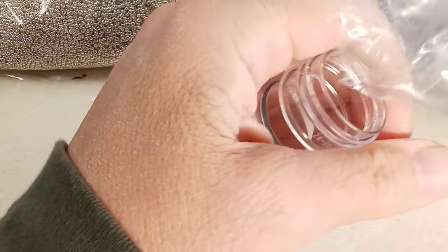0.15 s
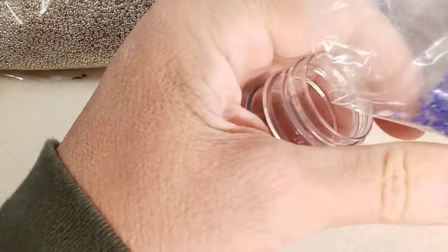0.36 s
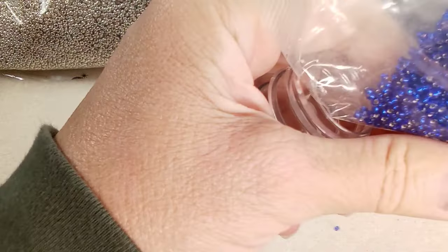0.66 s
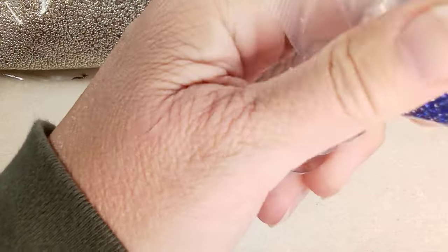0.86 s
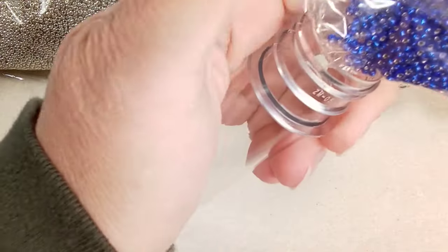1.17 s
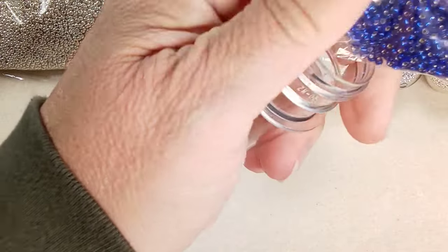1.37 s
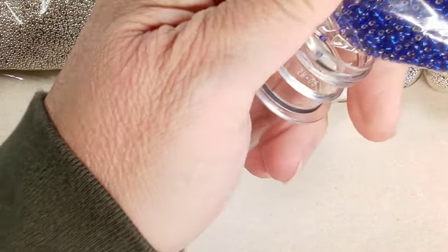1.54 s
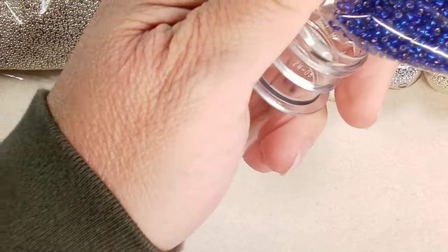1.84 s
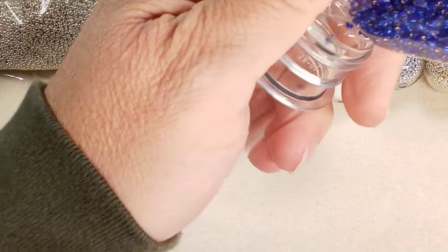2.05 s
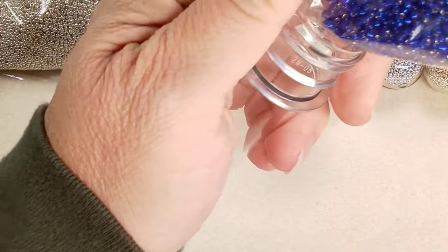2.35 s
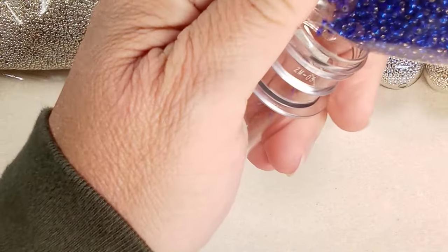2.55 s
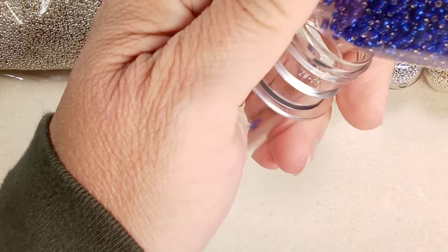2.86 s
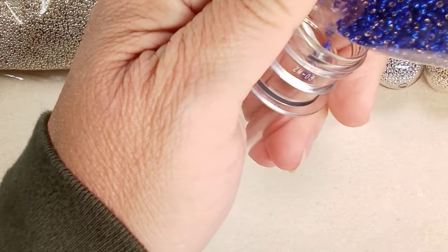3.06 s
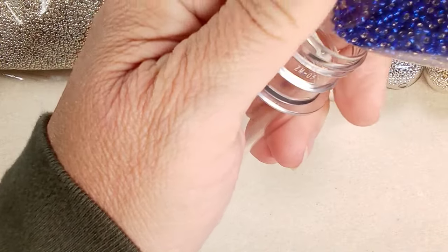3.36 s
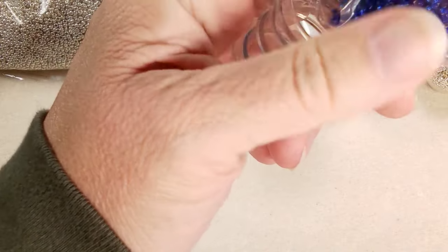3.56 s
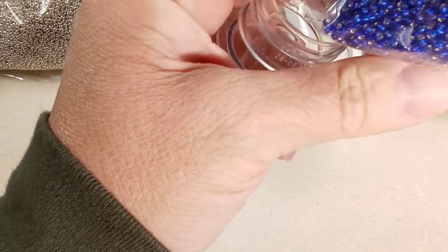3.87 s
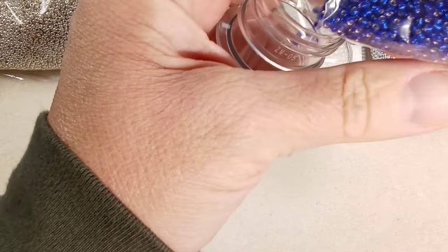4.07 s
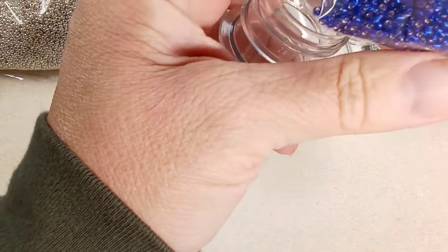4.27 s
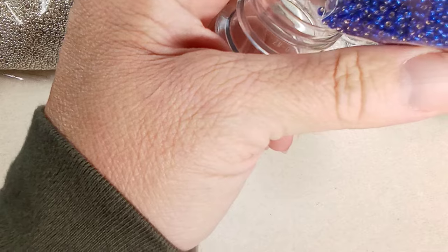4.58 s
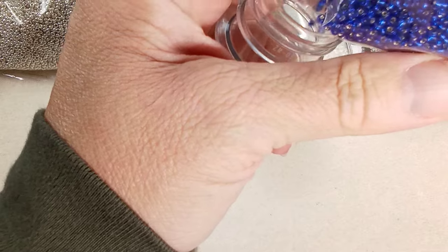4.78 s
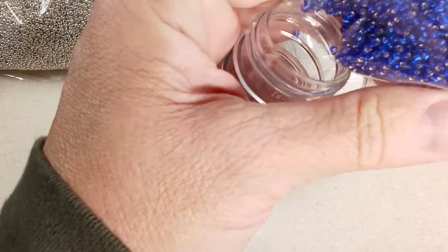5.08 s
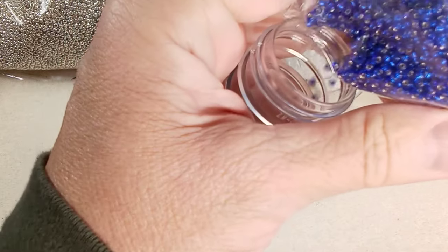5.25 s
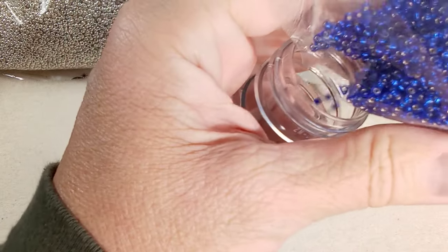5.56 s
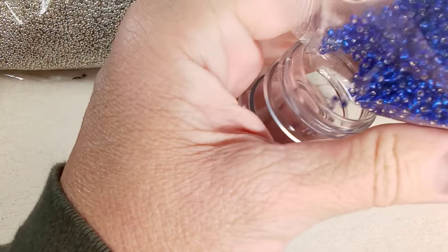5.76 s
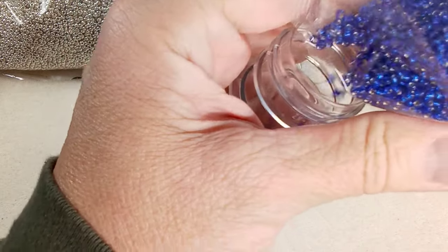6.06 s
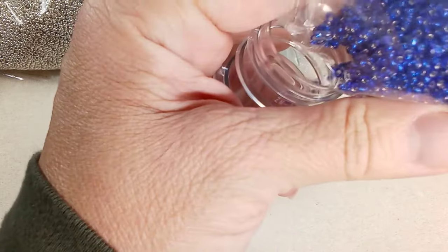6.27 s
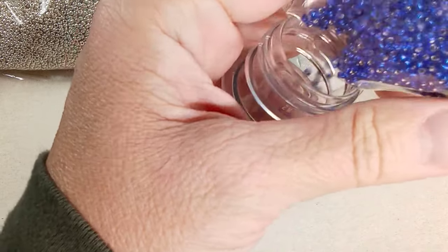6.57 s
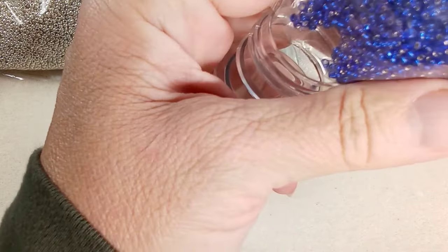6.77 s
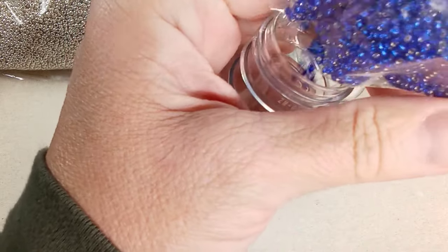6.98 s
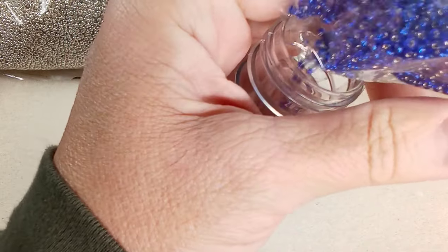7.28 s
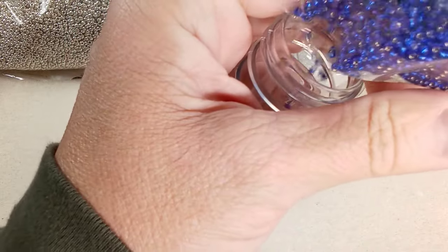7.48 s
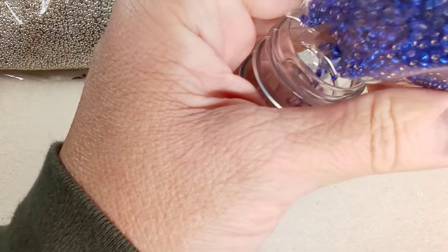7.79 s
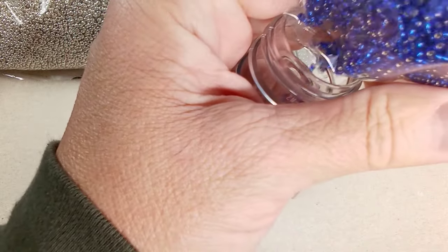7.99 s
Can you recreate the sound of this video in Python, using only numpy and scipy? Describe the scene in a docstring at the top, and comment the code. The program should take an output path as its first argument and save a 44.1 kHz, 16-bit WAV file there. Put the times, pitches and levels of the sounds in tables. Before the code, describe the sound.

A thin plastic bag of tiny glass beads crinkles and snaps sharply over a small jar, then quiets to sparse ticks before rustling again.

```python
"""In a quiet room, a thin plastic bag of tiny glass beads is tipped and squeezed over a small jar in the hand.
Clumped random clicks ring short resonances: the film crinkles, beads tick on each other and the jar.
Single snaps are cracks with a decaying sine; creases and pushes boom faintly in the hollow of jar and hand.
Below lie filtered-noise hiss, rumble and thuds and a wavering sine hum; a small microphone hears little
above 4 kHz."""
import sys
import numpy as np
from scipy import signal
from scipy.fft import rfft, irfft
from scipy.io import wavfile
from scipy.ndimage import uniform_filter1d

SR = 44100
rng = np.random.default_rng(int(sys.argv[2]) if len(sys.argv) > 2 else 0)


def to_wav(s):
    """Save 16-bit WAV."""
    ch = np.atleast_2d(s).T  # columns
    pcm = np.round(np.clip(ch, -1, 1) * 32767)  # PCM
    wavfile.write(sys.argv[1], SR, pcm.astype(np.int16))


N = 358533

# Snaps of the film and lone bead hits, before filters and microphone.
# Each row: start in seconds, ring level in dB, ring pitch in Hz, push into the hollow in dB.
SNAPS = [(0.026, -53, 851, -56), (0.101, -51, 1640, -81), (0.219, -49, 1630, -76), (0.239, -39, 2520, -70),
         (0.2473, -37, 1710, -75), (0.2723, -40, 2740, -47), (0.3446, -35, 1590, -47.5),
         (0.3953, -22, 1520, -42), (0.6045, -27, 1650, -36.5), (0.6464, -41, 1730, -43.5),
         (0.712, -43, 1780, -42.5), (0.7321, -23.5, 1560, -39.5), (0.7866, -20.5, 1620, -29.5),
         (0.8268, -25, 3320, -27.5), (0.848, -27, 2650, -45), (0.8699, -26.5, 1460, -41),
         (0.9097, -18.5, 1500, -38), (0.9382, -19, 1520, -31.5), (0.9687, -42, 1560, -48),
         (0.9811, -26, 1600, -34), (1.0155, -17.5, 1580, -43), (1.058, -32, 1850, -65),
         (1.1042, -33, 1800, -61), (1.2119, -39, 1620, -70), (1.4112, -32.5, 2560, -53.5),
         (1.438, -32, 1830, -60.5), (1.4657, -20.5, 1590, -30), (1.479, -16, 1540, -29.5),
         (1.4986, -20, 1490, -28), (1.5307, -20, 3250, -31.5), (1.5725, -13, 1500, -32.5),
         (1.6099, -27.5, 1920, -37.5), (1.636, -35.5, 3150, -47), (1.6596, -25.5, 2350, -42.5),
         (1.733, -30.5, 3220, -37), (1.7749, -31, 1740, -41), (1.8447, -39.5, 1800, -62),
         (1.8663, -32.5, 1700, -52), (1.8873, -34.5, 1700, -48), (1.933, -36, 1540, -47.5),
         (1.9784, -48, 1800, -39.5), (1.9957, -20.5, 1600, -37.5), (2.035, -42, 1580, -36.5),
         (2.0446, -29, 1600, -39), (2.05, -31, 1440, -44), (2.0697, -33.5, 2680, -54),
         (2.095, -17.5, 1870, -37.5), (2.1, -16, 980, -49), (2.108, -24.5, 2820, -41),
         (2.157, -32.5, 1490, -48.5), (2.1862, -31.5, 1440, -52), (2.269, -24, 1580, -44.5),
         (2.356, -37, 1630, -69), (2.394, -35.5, 1610, -76), (2.4125, -40.5, 1610, -81),
         (2.4392, -31.5, 1640, -66), (2.4781, -28.5, 2700, -49), (2.5323, -40, 1530, -52),
         (2.5493, -43, 1710, -46), (2.6304, -32, 1600, -47), (2.6339, -34, 2550, -51.5),
         (2.6577, -30.5, 1770, -48), (2.6944, -37, 1820, -59), (2.7089, -33.5, 1630, -61),
         (2.7402, -30, 1490, -60), (2.7617, -26, 1680, -48), (2.8144, -33.5, 1600, -52),
         (2.8951, -29.5, 1310, -49), (2.9352, -42, 2440, -65), (3.0974, -42.5, 2370, -72),
         (3.1628, -35, 1380, -81), (3.2307, -47, 2670, -56), (3.2453, -39, 2140, -68),
         (3.3469, -44, 1430, -65), (3.509, -35.5, 1520, -68), (3.5623, -39, 3030, -83),
         (3.6022, -36, 1380, -67), (3.641, -46, 3000, -78), (3.6553, -40, 1630, -83),
         (3.6745, -32.5, 1780, -86), (3.711, -38.5, 1570, -79), (3.7405, -35, 1830, -83),
         (3.7569, -35, 1790, -76), (3.968, -42, 1410, -64), (4.0205, -39.5, 1780, -59.5),
         (4.1558, -37, 1820, -80), (4.3264, -35, 1230, -40), (4.3361, -34.5, 1590, -72.5),
         (4.4915, -48.5, 3290, -72), (4.6613, -49.5, 3180, -79.5), (4.6718, -48, 2930, -81),
         (4.7207, -46.5, 2930, -78), (4.8478, -39, 1820, -84), (4.8716, -38, 3050, -76),
         (4.883, -39, 2920, -84), (4.9162, -35, 1820, -75), (5.0, -50, 3100, -74),
         (5.0848, -54.5, 3130, -75), (5.3973, -47, 3130, -74), (5.4279, -38.5, 3000, -55),
         (5.5764, -46.5, 3080, -79), (5.5912, -33, 1880, -75), (5.6329, -45.5, 3080, -74.5),
         (5.766, -36.5, 3120, -80), (5.7728, -37, 3050, -71), (5.7858, -25, 1550, -47.5),
         (5.8596, -37, 1870, -68), (5.8947, -34, 1780, -77), (5.9204, -35.5, 3000, -74),
         (5.9502, -37, 1820, -78), (5.9899, -15, 1466, -37), (6.023, -31, 3370, -44.5),
         (6.0612, -21, 1570, -34), (6.132, -27.5, 1400, -47.5), (6.2007, -45, 2350, -49),
         (6.2456, -40, 2860, -47.5), (6.381, -27.5, 1130, -49.5), (6.4847, -31, 1820, -58),
         (6.5086, -29, 1470, -50.5), (6.5197, -37.5, 3060, -63), (6.5951, -40.5, 3080, -52),
         (6.685, -42.5, 3960, -76), (6.7438, -38, 1920, -65), (6.9124, -40.5, 1600, -78),
         (6.937, -33.5, 3660, -41), (6.9547, -31, 1400, -43), (7.006, -35.5, 1510, -58),
         (7.106, -37.5, 1530, -83), (7.1326, -43.5, 2900, -81), (7.193, -45.5, 2850, -78),
         (7.3788, -34.5, 1670, -53), (7.3934, -25.5, 1470, -67), (7.4325, -34, 1530, -70),
         (7.4896, -31.5, 1630, -69), (7.5118, -35.5, 1630, -68), (7.5815, -36.5, 1400, -67),
         (7.6584, -39.5, 1730, -65), (7.7147, -46, 3330, -74), (7.7437, -38.5, 3200, -76),
         (7.758, -34, 1640, -83), (7.7958, -27.5, 1600, -70), (7.877, -35, 3100, -56),
         (7.9498, -34.5, 1580, -68), (7.9655, -31.5, 2530, -57), (8.053, -22, 1070, -58),
         (8.0957, -22, 1450, -64)]


def rustle(tick_gain, crinkle_gain, deep_gain, upper_gain):
    """Beads shift and tap the jar, the film creases, and the creases shake the hollow."""
    # Jar wall modes. Each row: pitch in Hz, width in Hz, relative level in dB.
    jar = [(1400, 150, 0), (1650, 180, 2), (1820, 73, -1.5), (2510, 430, -2), (3120, 220, 1.5),
           (3845, 220, 1), (5000, 570, -10), (6800, 1100, -0.5)]
    # a stronger rush holds more beads and fuses into a hiss
    crowd = np.clip(uniform_filter1d(tick_gain, size=4410) / from_db(-58), 0.5, 2.5)
    creases = grains(2500 * crowd, uneven_db=4.0, clumps_db=3.0)
    taps = grains(2500 * crowd, uneven_db=4.0, clumps_db=1.5) + 0.36 * creases

    wall = rms_one(modes(taps, jar, wander_db=3.0))
    ticks = high(rattle(taps, 2400, 7800, cycles=15.0) + 0.95 * wall, 1600)
    crinkle = band(rattle(creases, 1240, 2600, cycles=4.0) + 1.22 * wall, 1150, 2305)

    push = grains(900, uneven_db=2.0, clumps_db=6.5) + 0.51 * creases
    deep, upper = hollow(push, wander_db=3.5)
    return (sizzle(taps, tick_gain) + tick_gain * rms_one(ticks) + crinkle_gain * rms_one(crinkle)
            + deep_gain * rms_one(deep) + upper_gain * rms_one(upper))


def sizzle(taps, tick_gain):
    """The finest bead-on-bead noise; its level varies less than the rush does."""
    trickle_start_s, trickle_db = 2.42, 3.0   # more trickling from here on, reached within 1 s
    follows = 0.6                             # share of the rush's swing in dB
    since_s = np.clip(np.arange(N) / SR - trickle_start_s, 0, 1)
    level = from_db(-24.5 + trickle_db * since_s ** 0.2)
    rush = uniform_filter1d(tick_gain, size=2205) ** follows
    fine = band(rms_one(taps) + rng.standard_normal(N), 5600, 11000)
    return level * rush * rms_one(fine)


def effort():
    """Gains of ticks, crinkle, deep and upper hollow: rustle, squeezes and stirs added in power."""
    # Underlying rustle.
    # Each row: time in seconds, then levels in dB of bead ticks, film crinkle, deep and upper hollow.
    underlying = [(0, -70, -81, -74, -72), (.19, -88, -79, -94, -85), (.27, -53, -49.5, -60, -55.5),
                  (.41, -39.5, -36.5, -49.5, -40.5), (.55, -46, -42, -52.5, -52.5),
                  (.76, -55, -47, -56, -55.5), (1.0, -50, -41.5, -50.5, -48), (1.2, -68, -60, -73, -73.5),
                  (1.27, -85.5, -83, -84, -89.5), (1.35, -95, -88.5, -89.5, -97.5),
                  (1.46, -56, -55, -68, -61.5), (1.7, -61.5, -64, -66, -62), (1.85, -68.5, -62, -74, -68),
                  (2.05, -58, -53.5, -60, -56), (2.34, -73, -65, -87, -84.5), (2.5, -55, -48, -55.5, -58.5),
                  (2.87, -53, -47, -58, -50.5), (3.28, -63, -64, -86.5, -64), (3.5, -60, -56, -79, -76),
                  (3.76, -59.5, -57, -81.5, -83), (3.94, -62.5, -73, -86, -84),
                  (4.28, -64.5, -80, -84, -87), (4.62, -66, -88, -92, -91.5), (5.1, -63, -76.5, -89, -85),
                  (5.25, -72, -86, -88, -95), (5.37, -78, -86, -93, -99), (5.5, -63, -76.5, -84, -89.5),
                  (5.75, -61, -80, -87, -95), (6.1, -52, -50.5, -58, -59), (6.45, -62.5, -62.5, -79.5, -70),
                  (6.64, -59, -66.5, -84, -72.5), (6.9, -63.5, -67, -91.5, -77.5),
                  (7.28, -53, -58.5, -85, -75.5), (7.68, -59.5, -63, -84.5, -70),
                  (7.9, -50, -48, -70.5, -56.5), (8.13, -47, -43.5, -60.5, -55)]
    # Squeezes and tips of the bag, each a quick rush that dies away.
    # Each row: start in seconds, time to fall 20 dB in seconds,
    # then levels in dB of bead ticks, film crinkle, deep and upper hollow.
    squeezes = [(.012, .06, -57, -62, -72, -56), (.6, .08, -50, -43, -45.5, -47),
                (0.785, 0.0478, -40, -30, -39, -36.5), (0.825, 0.0737, -37.5, -36, -33.5, -33.5),
                (.92, 0.0834, -44, -38.5, -46, -43), (.98, 0.11, -45, -40.5, -40, -42),
                (1.205, 0.03, -57.5, -51.5, -75, -74.5), (1.37, .08, -72, -72, -72, -70),
                (1.41, .07, -55.5, -55, -64.5, -62), (1.466, .15, -44, -43.5, -53, -46),
                (1.573, .05, -39.5, -33.5, -61, -43), (1.61, .14, -47, -43.5, -66, -45),
                (1.732, 0.04, -53.5, -53, -56, -59), (1.775, 0.06, -50.5, -48, -62, -57),
                (1.93, .05, -60, -54, -58, -52), (1.965, .1, -60, -56, -46, -56),
                (2.035, 0.08, -47, -40, -41, -48), (2.094, 0.08, -36, -34, -49, -49),
                (2.17, .07, -54, -50, -50, -59), (2.267, 0.02, -43.5, -51, -47.5, -51),
                (2.356, .1, -60, -50.5, -85, -83), (2.44, 0.16, -52, -47, -60, -58),
                (2.62, 0.1, -48, -43.5, -55, -50), (2.84, .06, -54, -52, -57, -43.5),
                (3.21, .07, -60, -55, -80, -57), (3.345, .12, -65, -56, -80, -70),
                (3.4, 0.09, -58, -53, -47.5, -70), (3.49, 0.05, -57, -50, -45.5, -52.5),
                (3.965, 0.12, -60, -58.5, -54, -76), (4.02, 0.25, -60, -57.5, -71, -66),
                (4.322, .06, -54, -49, -41, -55), (4.66, 0.08, -53, -62, -92, -94.5),
                (4.846, 0.14, -53, -57.5, -90, -85), (4.915, 0.05, -47, -46.5, -83, -75),
                (5.0, 0.27, -57.5, -71, -79, -72), (5.166, .07, -54, -52.5, -50.5, -70),
                (5.397, .04, -58, -68, -90, -90), (5.428, 0.1048, -52.5, -51, -52, -55.5),
                (5.59, 0.12, -57, -52, -85, -88), (5.752, .05, -52, -54, -85, -85),
                (5.781, .08, -46, -43, -43.5, -50), (5.9, 0.02, -52, -54, -85, -81),
                (5.992, .14, -48, -42, -48.5, -54), (6.062, 0.1461, -46.5, -43.5, -41, -41.5),
                (6.24, 0.15, -50, -48, -49.5, -56), (6.378, 0.0853, -51.5, -47, -57, -49.5),
                (6.485, 0.17, -53, -49.5, -65, -55), (6.565, 0.07, -55, -55, -69, -52),
                (6.685, 0.14, -56, -55.5, -85, -67), (6.84, 0.1, -53, -56, -90, -76),
                (6.937, 0.1, -54.5, -45.5, -44.5, -52), (7.384, 0.13, -52, -47, -73, -49.5),
                (7.655, 0.16, -54, -54, -84, -65), (7.72, 0.08, -51, -51.5, -82, -70),
                (7.79, .08, -50, -46, -75, -54), (7.955, .07, -45, -42, -67, -59)]
    rise_s, hold = 0.008, 1.39     # the larger hold, the longer a rush holds and the sharper it stops
    stir_db, stir_s = -22, 0.012   # each snap stirs beads and film briefly

    power = from_db(in_time(underlying)) ** 2
    t = np.arange(SR) / SR
    for start_s, fall_s, *db in squeezes:
        i = round(start_s * SR)
        shape = (1 - np.exp(-t / rise_s)) * from_db(-20 * (t / fall_s) ** hold)
        power[:, i:i + SR] += (from_db(db)[:, None] * shape[:N - i]) ** 2

    start_s, db = np.transpose(SNAPS)[:2]
    kicks = np.zeros(N)
    np.add.at(kicks, (start_s * SR).astype(int), from_db(db + stir_db) ** 2)
    power[:2] += signal.lfilter([1], [1, -np.exp(-2 / (stir_s * SR))], kicks + 1e-18)
    return np.sqrt(power)


def snaps(upper_to_deep):
    """A sharp crack, a short ring of the panel that gave way, a noisy after-shake, a push into the hollow."""
    ring_s = 0.0012
    crack_db, crack_s = -8.5, 0.0006
    shake_db, shake_s = -12, 0.001
    settle_db, settle_s = -24, 0.027
    shove_db, shove_s = -15, 0.0057
    upper_share = 0.5

    length = 4096
    out, push = np.zeros(N + length), np.zeros(N + length)
    t = np.arange(length) / SR
    chance = rng.standard_normal((len(SNAPS), length))
    for (start_s, db, hz, push_db), noise in zip(SNAPS, chance):
        i = round(start_s * SR)
        ring = np.sin(2 * np.pi * hz * t) * np.exp(-t / ring_s)
        crack = from_db(crack_db) * noise * np.exp(-t / crack_s)
        # the film shakes, then the beads settle
        film_shake = from_db(shake_db) * np.exp(-t / shake_s)
        bead_settle = from_db(settle_db) * np.exp(-t / settle_s)
        shake = noise * (film_shake + bead_settle)
        # random polarity from the spare end of the noise
        out[i:i + length] += np.sign(noise[-1]) * from_db(db) * (ring + crack + shake)
        push[i:i + length] += from_db(push_db + shove_db) * noise[::-1] * np.exp(-t / shove_s)
        push[i] += np.sign(noise[-2]) * from_db(push_db)

    click = np.eye(1, 2048)[0]
    deep_peak = np.abs(hollow(click)[0]).max()   # height of the deep ring after a unit push
    deep, upper = hollow(push[:N] / deep_peak)
    # the push goes where the hand is pressing: to the deep or to the upper modes
    tilt = np.clip(upper_to_deep ** (upper_share / 2), 0.25, 4)
    return high(high(out[:N], 950), 950) + deep / tilt + upper * tilt


def hollow(push, wander_db=0):
    """The air in hand, jar and bag rings at a few low modes: deep ones and upper ones."""
    # Air in the cupped hand. Each row: pitch in Hz, width in Hz, relative level in dB.
    hand_air = [(179.5, 20, -2.5), (220, 140, -3.5), (335, 31.7, 7), (473, 39.7, 1)]
    # Air in the jar and bag. Each row: pitch in Hz, width in Hz, relative level in dB.
    jar_air = [(502, 81, -4.5), (612.6, 79, -2), (740.4, 47, -4), (837, 49, -4.5), (929, 150, -8)]
    deep = band(modes(push, hand_air), 98, 600)
    upper = band(modes(push, jar_air, wander_db), 534, 1200)
    return deep, upper


def grains(per_s, uneven_db, clumps_db):
    """Random clicks, mostly small, in clumps; scaled so that power does not depend on per_s."""
    sizes = from_db(uneven_db * np.minimum(rng.exponential(1, N), 5))
    signs = rng.choice([-1, 1], N)
    chance = per_s * from_db(clumps_db * drift(25)) / SR
    return signs * sizes * (rng.random(N) < chance) / np.sqrt(per_s)


def rattle(clicks, low_hz, high_hz, cycles):
    """Clicks dealt at random to twelve short rings spread over a band; rms 1."""
    dealt = rng.integers(0, 12, N)
    pitches_hz = np.geomspace(low_hz, high_hz, 12)
    return rms_one(sum(resonance(clicks * (dealt == k), hz, hz / cycles) for k, hz in enumerate(pitches_hz)))


def modes(push, table, wander_db=0):
    """A body rings at its (Hz, width Hz, dB) modes; a shifting grip lets each swell and fade."""
    total = 0
    for k, (hz, width_hz, db) in enumerate(table):
        wander = wander_db * drift(3) if wander_db else 0
        total = total + (-1) ** k * from_db(db + wander) * resonance(push, hz, width_hz)
    return total


def reflections(x, t60_s=0.12):
    """Table and walls return a short noisy tail."""
    t = np.arange(SR // 4) / SR
    tail = rng.standard_normal(len(t)) * from_db(-60 * t / t60_s) * (t > 0.002)
    return signal.fftconvolve(x, tail / np.sqrt(np.sum(tail ** 2)))[:N]


def handling_thuds(deep_gain):
    """Low noise that follows the hand's pressing, plus soft bell-shaped thuds."""
    # Soft thuds of handling. Each row: peak time in seconds, level in dB.
    bump_rows = [(.41, -56), (.86, -47.5), (1.04, -57.5), (1.5, -61), (1.64, -62.5), (2.1, -50.5),
                 (2.6, -58.5), (4.35, -66), (5.16, -70.5), (6.07, -51.5), (6.2, -61), (6.54, -64),
                 (6.95, -58), (7.9, -69)]
    half_width_s = 0.05
    press_db, follows = -72, 0.8   # level at a deep hollow of -55 dB; share of its swing in dB
    t = np.arange(N) / SR
    press = uniform_filter1d(deep_gain, size=2205) / from_db(-55)
    bumps = sum(from_db(db) * np.exp(-((t - s) / half_width_s) ** 2) for s, db in bump_rows)
    return (from_db(press_db) * press ** follows + bumps) * rms_one(band(rng.standard_normal(N), 100, 190))


def low_hum():
    """A low sine of wavering pitch that comes and goes."""
    # Hum swells. Each row: start in seconds, length in seconds, rms level in dB.
    swells = [(2.85, .17, -62.5), (4.03, 0.24, -65.5), (4.94, 0.37, -61)]
    hum_hz, waver_hz, edge_s = 78.6, 2.1, 0.04
    t = np.arange(N) / SR
    swell = sum(from_db(db) * np.clip(np.minimum(t - s, s + length_s - t) / edge_s, 0, 1)
                for s, length_s, db in swells)
    phase = 2 * np.pi * np.cumsum(hum_hz + waver_hz * drift(4)) / SR
    return np.sqrt(2) * swell * np.sin(phase)


def room_tone():
    """Faint coloured hiss and a house rumble of wavering level."""
    # Hiss spectrum. Each row: frequency in Hz, relative level in dB.
    spectrum = [(88, -35.5), (150, -18), (209, -15.5), (489, -25), (819, -24), (875, -11), (2010, -27.5),
                (3100, -30), (8000, -52), (10400, -86.5), (17600, -120)]
    hiss_db, rumble_db, waver_db = -86, -74, 4.3
    hiss = from_db(hiss_db) * rms_one(colour(rng.standard_normal(N), spectrum))
    low = rms_one(band(rng.standard_normal(N), 34, 130))
    return hiss + from_db(rumble_db + waver_db * drift(9)) * low


def from_db(db):
    """Decibels to gain."""
    return 10 ** (np.asarray(db) / 20)


def rms_one(x):
    """Scaled to rms 1."""
    return x / np.sqrt(np.mean(x ** 2) + 1e-20)


def in_time(rows):
    """Each column after the time, interpolated to one value a sample."""
    s, *columns = np.transpose(rows)
    return [np.interp(np.arange(N) / SR, s, c) for c in columns]


def drift(rate_hz):
    """Slow chance: noise through a double one-pole low-pass, rms 1."""
    r = np.exp(-2 * np.pi * rate_hz / SR)
    slow = signal.lfilter([1], [1, -2 * r, r * r], rng.standard_normal(N + SR))
    return rms_one(slow[SR:])   # the first second is run-in


def resonance(x, hz, width_hz):
    """A two-pole resonance of about unit gain at its peak."""
    r = np.exp(-np.pi * width_hz / SR)
    zeros = [(1 - r * r) / 2, 0, (r * r - 1) / 2]
    poles = [1, -2 * r * np.cos(2 * np.pi * hz / SR), r * r]
    return signal.lfilter(zeros, poles, x + 1e-18)


def colour(x, spectrum):
    """A causal (minimum-phase) filter that follows (Hz, dB) points."""
    hz, db = np.transpose(spectrum)
    grid_hz = np.linspace(1, SR / 2, 4097)
    log_gain = np.interp(np.log(grid_hz), np.log(hz), db) * np.log(10) / 20
    # fold the cepstrum onto positive time
    cepstrum = irfft(log_gain)
    cepstrum[1:4096] *= 2
    cepstrum[4097:] = 0
    return signal.fftconvolve(x, irfft(np.exp(rfft(cepstrum))))[:N]


def high(x, hz):
    """A steep high-pass."""
    return signal.sosfilt(signal.butter(4, hz, "high", fs=SR, output="sos"), x)


def band(x, low_hz, high_hz):
    """A steep band-pass."""
    return signal.sosfilt(signal.butter(3, [low_hz, high_hz], "band", fs=SR, output="sos"), x)


def scene():
    """Bag and jar close by, the room behind."""
    gains = effort()
    deep_gain, upper_gain = gains[2:]
    hits = snaps(upper_gain / deep_gain)
    near = rustle(*gains) + hits + from_db(-18.0) * reflections(hits)
    return (near + handling_thuds(deep_gain) + low_hum() + room_tone())[None]


def record(dry):
    """Microphone colour, a steep top cut and the converter's own faint hiss."""
    # Microphone response. Each row: frequency in Hz, gain in dB.
    microphone = [(30, -6.5), (60, -7), (1400, -3), (1620, 1.5), (1900, -2), (2050, -5.5), (2250, 2.5),
                  (3100, 4.5), (3900, 1.5), (4500, -6.5), (5500, -23), (6200, -23), (7200, -26),
                  (7800, -38), (8200, -46)]
    stop_hz, stop_db, hiss_db = 8300, 50, -102
    top_cut = signal.cheby2(16, stop_db, stop_hz, fs=SR, output="sos")
    heard = signal.sosfilt(top_cut, colour(dry[0], microphone))
    return (heard + from_db(hiss_db) * rng.standard_normal(N))[None]


dry = scene()
out = record(dry)
to_wav(out)
```